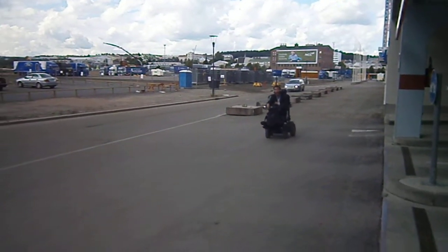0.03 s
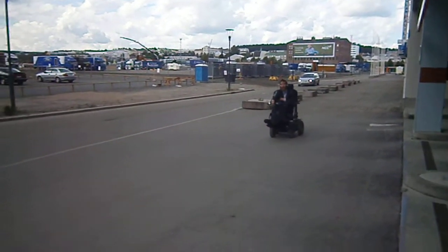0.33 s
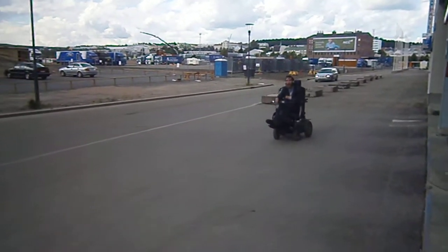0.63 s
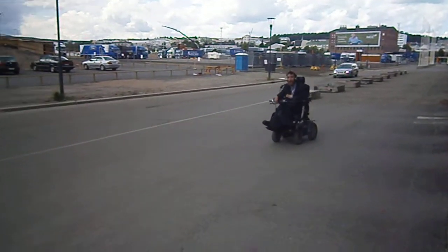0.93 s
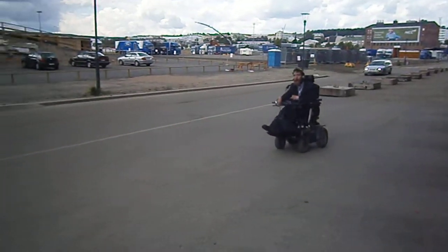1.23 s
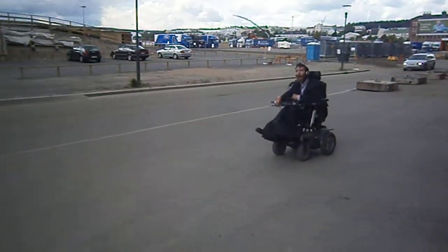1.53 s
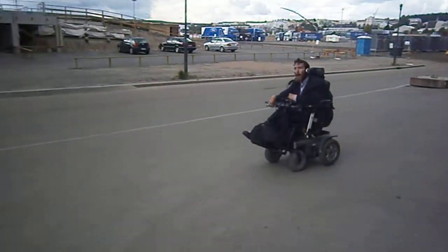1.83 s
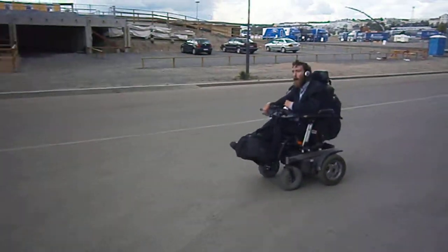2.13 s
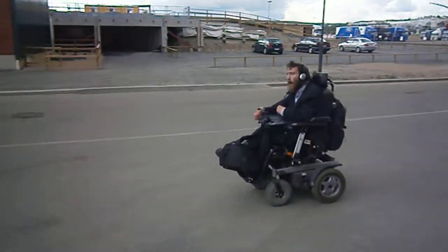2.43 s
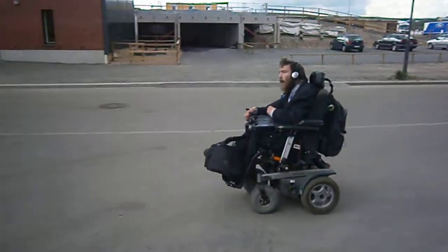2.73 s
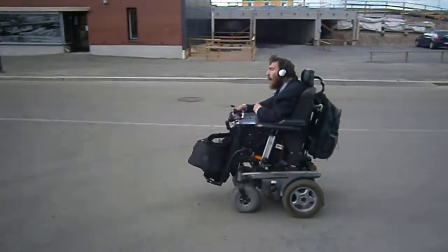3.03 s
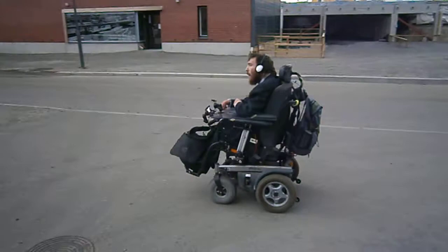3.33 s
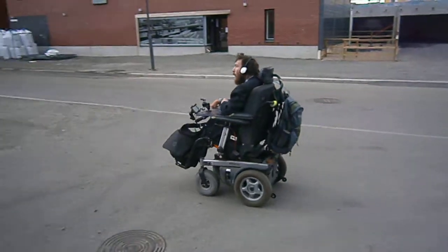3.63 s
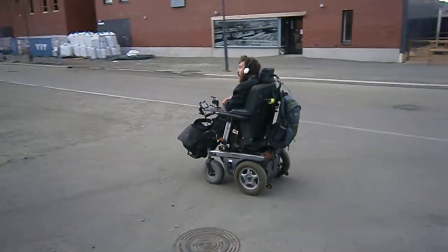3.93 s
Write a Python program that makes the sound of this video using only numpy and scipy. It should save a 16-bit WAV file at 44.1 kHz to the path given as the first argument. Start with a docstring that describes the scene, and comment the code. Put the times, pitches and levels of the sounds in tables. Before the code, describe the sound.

A powered wheelchair rolls over gritty asphalt, tyres hissing above distant traffic, all with a telephone-like tone. Its frame clicks now and then from 0.5 seconds, and its motors whine thinly from 0.7. A gust thumps the microphone at 1.5. The chair passes closest near 2.6 with a click and a tiny squeak. From 2.9 the strongest gusts hit, with a sharp overload crack at 3.4.

```python
"""A powered wheelchair rolls past a small camera on open asphalt, over a wash of distant traffic.
From the start its tyres hiss on grit; its frame clicks from 0.5 s, its motors whine thinly from 0.7 s.
A gust buffets the microphone at 1.5 s. Near 2.6 s the chair is closest and gives one tiny squeak.
From 2.9 s, as it turns away, the strongest gusts hit and the camera overloads, cracking loudest at 3.4 s.
All but the cracks is heard through the camera's telephone-like band."""
import sys
import numpy as np
from scipy import signal
from scipy.fft import rfft, irfft
from scipy.io import wavfile

SR = 44100
rng = np.random.default_rng(int(sys.argv[2]) if len(sys.argv) > 2 else 0)


def store_wav(level_fs):
    """Save 16-bit WAV to argv[1]."""
    pcm = np.round(np.clip(np.atleast_2d(level_fs), -1, 1) * 32767)
    wavfile.write(sys.argv[1], SR, pcm.T.astype(np.int16))


N = 176400
T = np.arange(N) / SR
BINS_HZ = np.maximum(np.arange(N // 2 + 1) * SR / N, 1)


def undb(db):
    """Decibels to gain."""
    return 10 ** (np.asarray(db) / 20)


def unit(x):
    """Scale to rms 1."""
    return x / np.sqrt(np.mean(x ** 2))


def curve(rows, column=1):
    """One column, linearly interpolated over time."""
    rows = np.array(rows)
    return np.interp(T, rows[:, 0], rows[:, column])


def gate(start_s, end_s, edge_s):
    """Window with linear ramps centred on its ends."""
    return np.clip(np.minimum(T - start_s, end_s - T) / edge_s + .5, 0, 1)


def shape(points):
    """Gain per bin from (f/Hz, level/dB) points."""
    hz, db = np.array(points).T
    return undb(np.interp(np.log(BINS_HZ), np.log(hz), db))


def filtered(x, gain):
    """Apply a gain per bin."""
    return irfft(rfft(x) * gain, N)


def lowpass(x, hz):
    """Steep elliptic low-pass."""
    return signal.sosfilt(signal.ellip(8, .2, 70, hz, fs=SR, output="sos"), x)


def minimum_phase(gain):
    """Response of a struck body: rings only after the blow."""
    cepstrum = irfft(np.log(gain), N)
    fold = np.r_[1, np.full(N // 2 - 1, 2), 1, np.zeros(N // 2 - 1)]
    return np.exp(rfft(cepstrum * fold))


def noise(spectrum):
    """Shaped noise, rms 1."""
    return unit(filtered(rng.standard_normal(N), shape(spectrum)))


def drift(rate_hz):
    """Slow random motion, rms 1."""
    return unit(filtered(rng.standard_normal(N), np.exp(-(BINS_HZ / rate_hz) ** 2)))


# Traffic spectrum: f/Hz, level/dB
TRAFFIC_SPECTRUM = [(20, -5.5), (90, -8.5), (200, -7.5), (350, -3.5), (480, 1), (700, -2.5), (1020, 4.5),
                    (1350, -2.5), (1900, -8.5), (3000, -6.5), (4500, -22.5)]


def traffic(level_db=-34.5, swell_db=.5, flicker_db=1.1):
    """Far roads: a wash with a hump of tyre roar; octaves flicker independently."""
    wash, out = noise(TRAFFIC_SPECTRUM), 0
    for octave in range(4, 14):
        band = np.clip(1 - np.abs(np.log2(BINS_HZ) - octave), 0, 1)
        out += filtered(wash, band) * undb(flicker_db * drift(7))
    return unit(out) * undb(level_db + swell_db * drift(2.9))


# Light-wind spectrum: f/Hz, level/dB
RUMBLE_SPECTRUM = [(15, -11.5), (35, -4), (70, 0.5), (130, -1), (220, -4), (400, -13.5), (700, -15),
                   (1500, -44), (4000, -66.5)]
# Strong-wind spectrum: f/Hz, level/dB
BLAST_SPECTRUM = [(20, -18), (60, -7), (130, 4), (250, 1.5), (400, -3), (700, -15), (1200, -27),
                  (2200, -37), (4000, -53.5)]
# Breeze envelope: t/s, level/dB
BREEZE_LEVELS = [(0, -37.5), (.8, -37.5), (1.4, -36), (2, -30.5), (2.5, -35.5), (3, -32), (3.5, -30.5),
                 (4, -25.5)]
# Gusts: t/s, length/s, level/dB
GUST_EVENTS = [(0.288, 0.065, -34), (0.875, .07, -33.5), (1.284, 0.084, -31.5), (1.468, 0.064, -23),
               (1.537, .1, -27), (1.844, 0.049, -26.5), (1.909, 0.13, -31), (2.106, 0.095, -38),
               (2.242, 0.088, -28.5), (2.582, 0.037, -27), (2.767, .15, -27), (2.928, 0.078, -14.5),
               (3.034, .095, -16.5), (3.175, 0.079, -18), (3.278, 0.099, -29.5), (3.406, 0.037, -24.5),
               (3.544, .048, -14.5), (3.591, .115, -20), (3.799, 0.03, -19), (3.863, 0.043, -28)]


def wind(edge_s=.021, rough_db=5, knee_db=-28.5):
    """Turbulence rumbles at the microphone: a breeze plus gusts, brighter when strong."""
    force = np.zeros(N)
    for start_s, length_s, db in GUST_EVENTS:
        force += undb(db) * gate(start_s, start_s + length_s, edge_s)
    bright = force ** 2 / (force ** 2 + undb(knee_db) ** 2)
    air = np.sqrt(1 - bright) * noise(RUMBLE_SPECTRUM) + np.sqrt(bright) * noise(BLAST_SPECTRUM)
    breeze = unit(noise(RUMBLE_SPECTRUM) * undb(2.5 * drift(21)))
    gusts = unit(air * undb(rough_db * drift(63)))
    return force * gusts + undb(curve(BREEZE_LEVELS)) * breeze


# Eddies at the microphone: t/s, level/dB, half width/ms
EDDY_EVENTS = [(1.494, 0, 0.49), (1.501, -15.5, 6.1), (1.511, -15.5, 1.7), (1.544, -13.5, 1.2),
               (1.582, -10.5, 1.1), (1.59, -8, 1.5), (1.615, -9.5, 0.48), (1.627, -9, 0.46),
               (1.652, -17.5, 1.9), (1.72, -18, 1.8), (1.82, -10.5, 1.9), (1.904, -12.5, 2.2),
               (1.951, -13.5, 1.66), (2.111, -15, 1.7), (2.157, -19.5, 1.9), (2.258, -15, 1.7),
               (2.836, -18.5, 1.2), (2.933, -7, 1.4), (2.949, -10.5, 1), (2.979, -4.5, 1.8),
               (3.027, -8.5, 1.4), (3.052, -8.5, 1.2), (3.089, -9, 1.2), (3.11, -7, 1),
               (3.127, -10.5, 0.97), (3.184, -12.5, 1.3), (3.199, -5, 0.84), (3.205, -1.5, 0.39),
               (3.209, -7.5, 0.61), (3.237, -8.5, 1), (3.246, -6.5, 0.79), (3.262, -1.5, 1.4),
               (3.29, -11, 1.4), (3.344, -11, .75), (3.421, -1.5, 1.6), (3.486, -15, 0.77),
               (3.565, -4.5, 0.82), (3.578, -6, 1.3), (3.632, -18.5, 0.51), (3.666, -13, 0.33),
               (3.685, -10, 1.4), (3.711, -13.5, 1.3), (3.824, -18, 4.8), (3.925, -17.5, 1)]


def eddies(wake_db=-6.5, wake_s=.0036, highpass_hz=56):
    """Each eddy thumps: suction, then pressure, amid a short turbulent wake."""
    swing, wake = np.zeros(N), np.zeros(N)
    for at_s, db, half_ms in EDDY_EVENTS:
        u = (T - at_s) / (half_ms / 1000)
        swing += undb(db) * 3 * u / (1 + u * u / 2) ** 3
        wake += undb(db) * np.exp(-np.abs(T - at_s) / wake_s)
    pressure = swing + undb(wake_db) * wake * noise(BLAST_SPECTRUM)
    return filtered(pressure, BINS_HZ ** 2 / (BINS_HZ ** 2 + highpass_hz ** 2))


# Overload cracks: t/s, peak level/dB, roll-off f/Hz
CRACK_EVENTS = [(1.4948, -28, 5540), (2.9325, -46, 6000), (3.4231, -13, 7460)]


def cracks(highpass_hz=3000):
    """Thin wide-band snaps, timed to the buffets that overload the camera."""
    out = 0
    for at_s, db, rolloff_hz in CRACK_EVENTS:
        gain = BINS_HZ / (BINS_HZ + highpass_hz) / (1 + (BINS_HZ / rolloff_hz) ** 2)
        snap = filtered(signal.unit_impulse(N, int(at_s * SR)), gain)
        out += undb(db) * snap / np.abs(snap).max()
    return out


# Tyre spectrum: f/Hz, level/dB
TYRE_SPECTRUM = [(300, -10), (1000, -14.5), (1800, -6), (2350, -5), (3000, -4), (3500, 2.5), (3750, 3),
                 (4100, 0), (5000, -17.5)]
# Tyre envelope as the chair nears and turns away: t/s, level/dB
TYRE_LEVELS = [(0, -38.5), (.2, -34), (.55, -35), (1, -35), (1.45, -33), (2, -31.5), (2.65, -30.5),
               (3.05, -32), (3.3, -37.5), (3.6, -35.5), (4, -31)]


def tyres(grains_per_s=240, grit_db=-10.5, spread_db=11, flicker_db=1.25):
    """Rubber hisses on asphalt and crunches fine grit."""
    grains = (rng.random(N) < grains_per_s / SR) * rng.choice([-1, 1], N)
    sizes = undb(spread_db * np.minimum(rng.exponential(size=N), 4))
    grit = unit(filtered(grains * sizes, shape(TYRE_SPECTRUM)))
    rolling = noise(TYRE_SPECTRUM) + undb(grit_db) * grit
    return rolling * undb(curve(TYRE_LEVELS) + flicker_db * drift(24))


def squeak(at_s=2.637, half_width_s=.0093, centre_hz=2830, rise_hz_per_s=21000, level_db=-25):
    """One tiny rising squeak."""
    age = T - at_s
    phase = 2 * np.pi * (centre_hz * age + .5 * rise_hz_per_s * age ** 2)
    return undb(level_db) * np.exp(-(age / half_width_s) ** 2) * np.sin(phase)


# Frame response: f/Hz, level/dB
FRAME_SPECTRUM = [(300, -24.5), (1300, -19), (1900, -7), (2400, -2), (3000, -5.5), (3650, 4.5),
                  (4200, -1.5), (5500, -11)]
# Frame clicks: t/s, peak level/dB, chatter/ms, ring f/Hz
CLICK_EVENTS = [(.4655, -12.5, 11, 3960), (0.993, -21.5, 6, 2550), (1.3477, 0.5, 1.5, 3490),
                (2.5447, 3, 2.8, 3565), (2.79, -8, 1.8, 3320), (3.149, -10.5, 3.7, 3950),
                (3.183, -17, 2.3, 2590), (3.937, -15, 3.3, 3610)]


def frame_clicks(strike_db=17, tail_db=-13.5, tail_s=.0036, bandwidth_hz=1900):
    """Loose parts strike, chatter for a few milliseconds and ring briefly."""
    out, body = 0, minimum_phase(shape(FRAME_SPECTRUM))
    for at_s, db, chatter_ms, ring_hz in CLICK_EVENTS:
        age = np.maximum(T - at_s, 0)
        chatter = np.exp(-(age * 1000 / chatter_ms) ** 4)
        tail = undb(tail_db) * np.exp(-age / tail_s)
        force = (T > at_s) * (chatter + tail) * rng.standard_normal(N)
        force[int(at_s * SR)] += undb(strike_db)
        click = filtered(force, body / (1 + 2j * (BINS_HZ - ring_hz) / bandwidth_hz))
        out += undb(db) * click / np.abs(click).max()
    return out


# Motor whines, one curve each: t/s, f/Hz, level/dB
WHINE_CURVES = [
    [(.7, 3450, -36), (.74, 3465, -34), (.9, 3570, -47), (1.05, 3665, -46), (1.17, 3685, -35),
     (1.29, 3830, -38), (1.4, 3735, -43), (1.52, 3810, -39), (1.75, 3900, -54)],
    [(1.53, 2580, -46.5), (1.63, 2550, -45), (1.8, 2600, -42), (1.92, 2580, -46.5)],
    [(2.14, 2420, -44), (2.3, 2330, -51), (2.5, 2160, -44)],
    [(2.78, 3310, -53), (2.92, 3240, -38.5), (3.08, 3205, -44), (3.18, 3200, -38.5)],
]


def motors(fade_s=.025, waver=.002, flutter_db=2.6):
    """Thin whines come and go, gliding with drive speed."""
    out = 0
    for rows in WHINE_CURVES:
        hz = curve(rows) * (1 + waver * drift(40))
        tone = np.sqrt(2) * np.sin(2 * np.pi * np.cumsum(hz) / SR)
        gain = undb(curve(rows, column=2) + flutter_db * drift(6.7))
        out += gate(rows[0][0], rows[-1][0], fade_s) * gain * tone
    return out


def scene():
    """Wind, traffic and wheelchair at one microphone."""
    return (wind() + eddies() + traffic() + tyres() + motors() + frame_clicks() + squeak())[None]


def record(dry):
    """Camera: soft clipping, a narrow band with its top mirrored by the low sample rate, added cracks."""
    ceiling, rate_hz = .68, 8000
    edge_hz, skirt_hz, top_hz = 3836, 4400, 15850
    clipped = dry / (1 + (dry / ceiling) ** 8) ** (1 / 8)
    band = filtered(clipped, BINS_HZ < rate_hz / 2)
    mirrored = band * (1 + 2 * np.cos(2 * np.pi * rate_hz * T))
    smooth = filtered(mirrored, 1 / (1 + (BINS_HZ / edge_hz) ** 22))
    return lowpass(lowpass(smooth, skirt_hz) + cracks(), top_hz)


dry = scene()
out = record(dry)
store_wav(out)
```